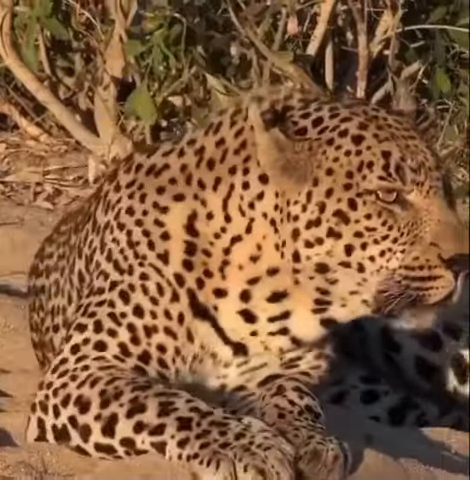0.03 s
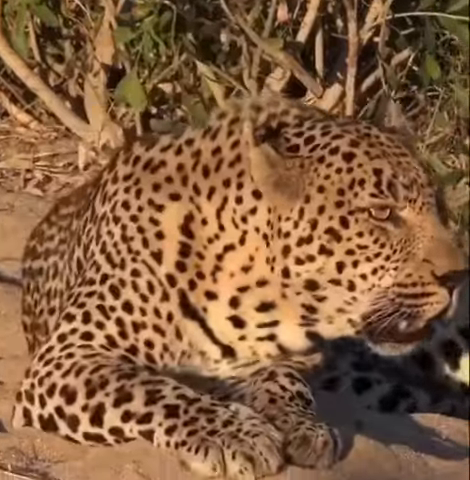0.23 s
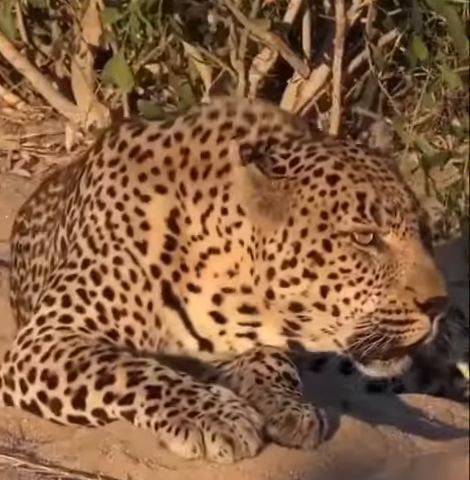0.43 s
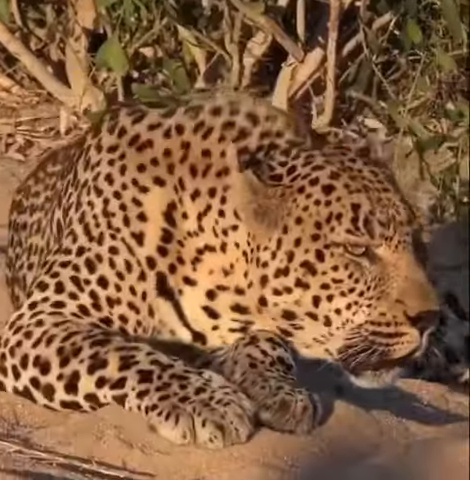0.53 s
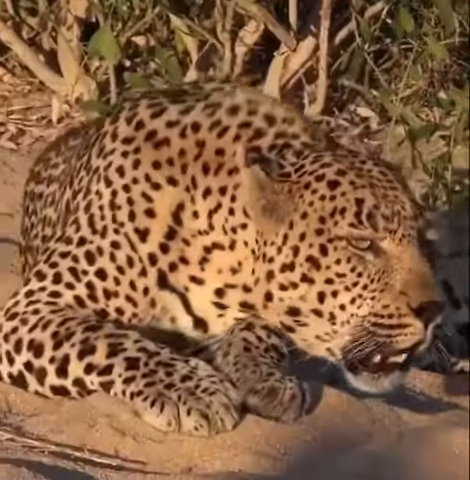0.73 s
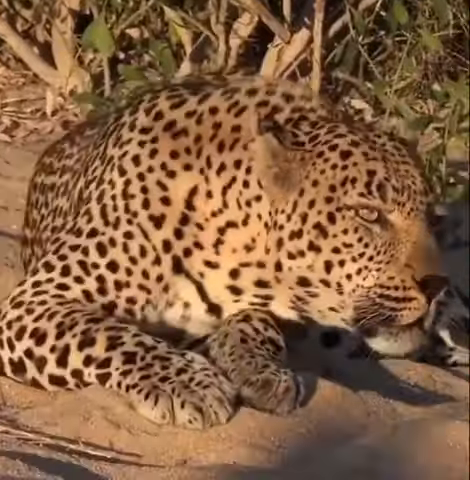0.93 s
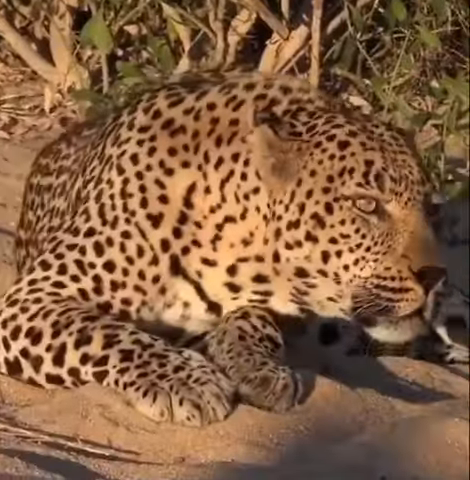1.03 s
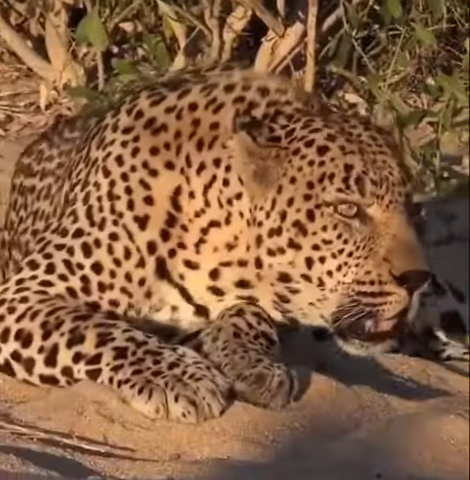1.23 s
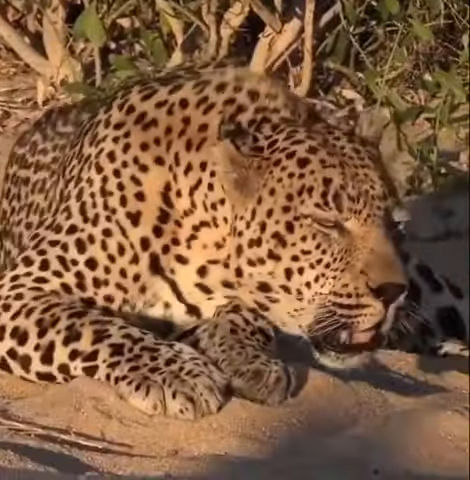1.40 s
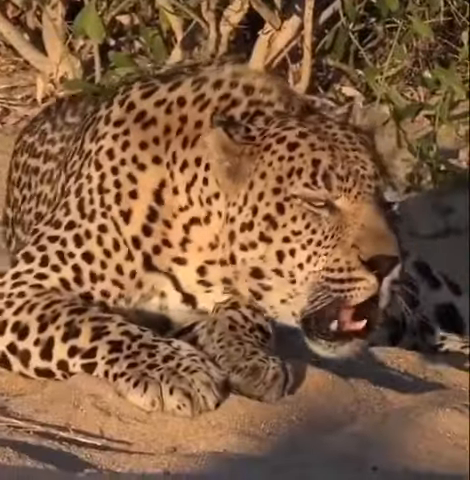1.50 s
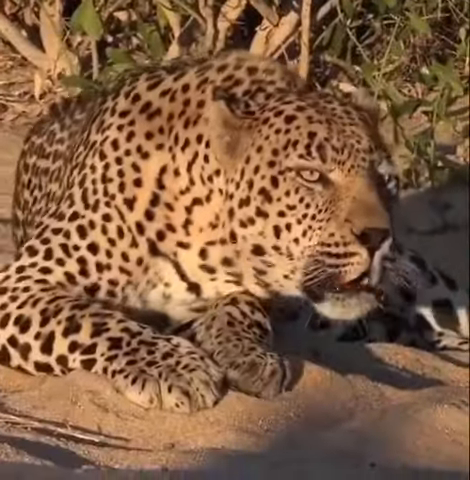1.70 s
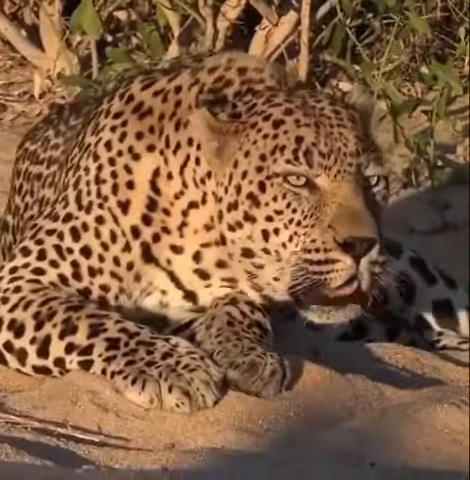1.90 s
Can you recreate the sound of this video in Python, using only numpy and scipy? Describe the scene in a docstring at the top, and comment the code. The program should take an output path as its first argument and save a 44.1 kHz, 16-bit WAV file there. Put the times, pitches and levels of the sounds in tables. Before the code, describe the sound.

A leopard growls twice, low and rasping, with quieter inward rasps around the growls.

```python
"""Leopard growling close by

Two loud outward growls, with quieter, slacker inward rasps around them. The throat hums near 200 Hz
while loose folds flap 15-65 times a second; each flap renews the hum, rings the mouth and spits air.
Tongue and palate click wetly. Behind lie two distant bird notes and a faint outdoor wash."""
import sys
import numpy as np
from scipy import signal
from scipy.fft import rfft, irfft
from scipy.io import wavfile
from scipy.ndimage import uniform_filter1d

SR = 44100
rng = np.random.default_rng(int(sys.argv[2]) if len(sys.argv) > 2 else 0)


def transcribe(signal):
    """Save signal, clipped to [-1, 1], as a 16-bit WAV file at the path in sys.argv[1]."""
    frames = np.atleast_2d(signal).T
    limited = np.clip(frames, -1, 1)
    pcm = np.round(limited * 32767).astype(np.int16)
    wavfile.write(sys.argv[1], SR, pcm)


N = 85995
T = np.arange(N) / SR

# Folds and tract, per growl: t/s, flap rate/Hz, throat f/Hz, mouth f/Hz, mouth decay/s
OUT_GESTURES = [
    [(.561, 47.4, 182.2, 630, 0.0053), (.59, 48, 194.7, 543, 0.002), (.66, 48.6, 212.1, 670, 0.0038),
     (.745, 51, 207.2, 700, 0.015), (.82, 38.7, 164, 632, 0.017), (.95, 19.9, 137.6, 627, 0.023)],
    [(1.381, 51.8, 184, 694, 0.0014), (1.41, 51, 192.6, 691, 0.0086), (1.46, 65.2, 220.1, 636, 0.01),
     (1.52, 61.7, 215.2, 624, 0.03), (1.57, 53.7, 206.4, 709, 0.0041), (1.62, 39, 169.8, 620, 0.017),
     (1.715, 24.7, 150.3, 637, 0.0046)],
]
# Drive, per growl: t/s, throat level/dB, mouth level/dB, rasp level/dB, hiss level/dB
OUT_DRIVE = [
    [(0.56, -14, -30.5, -35.5, -45), (0.59, -7.5, -14.5, -47, -40.5), (0.628, -4.5, -9, -29, -36.5),
     (0.634, -8.5, -14.5, -49, -40), (0.684, -5.5, -14, -26.5, -39), (0.714, -7, -32, -57, -47),
     (0.726, -6.5, -22.5, -35, -39.5), (0.774, -8.5, -16.5, -31, -42.5), (0.82, -10, -18, -32, -43),
     (0.89, -18, -40, -48, -50), (0.926, -19, -44, -38, -48.5), (0.946, -27.5, -48, -44.5, -56),
     (0.96, -33, -45, -53, -57)],
    [(1.38, -18.5, -31, -42.5, -45), (1.424, -8.5, -14.5, -22.5, -34.5), (1.436, -7, -17, -31, -38),
     (1.516, -9, -13.5, -27.5, -34.5), (1.546, -11.5, -32, -34, -39), (1.568, -4, -17.5, -26, -31.5),
     (1.588, -11.5, -17, -27, -38.5), (1.642, -10.5, -22.5, -32.5, -47.5), (1.652, -18, -20, -48, -31),
     (1.662, -14.5, -37, -50, -44.5), (1.694, -20, -41, -52, -53), (1.706, -27, -51, -43, -54.5),
     (1.73, -20, -54, -64, -63)],
]
# Muzzle response: f/Hz, level/dB
OUT_MUZZLE = [(440, -34.5), (750, 1), (786, -4), (918, -14), (985, -3), (1060, -19), (1160, -18.5),
              (1260, -12.5), (1390, -17), (1640, -8.5), (1780, -20), (2010, -9), (2290, -16), (2610, -27),
              (2830, -27.5), (3270, -27), (3680, -22), (4140, -25.5), (5190, -27), (5990, -32),
              (8150, -33.5), (9510, -43.5), (12800, -46.5), (16600, -92), (22000, -120)]
# Narrow muzzle resonances: f/Hz, width/Hz, gain
OUT_RESONANCES = [(990, 12, .4), (1677, 63, .8), (2010, 34, .7), (2780, 160, .8), (3600, 100, 1.3),
                  (3830, 53, 0.29), (4420, 23, 2.6), (5080, 110, .7), (5760, 52, 1.2), (8190, 300, 0.68)]


def outward_growls():
    """Breath driven out through a tight, steadily humming throat."""
    return sum(growl(gesture, drive, OUT_MUZZLE, OUT_RESONANCES, jitter_s=0.00019, damp_s=0.0044,
                     hum_db=9, hum_rise_s=0.0046, hum_decay_s=0.018, wobble=0.0397,
                     puff_db=-16.5, puff_hz=71.7, side_db=-5, side_ratio=1.148, mouth_db=9.5,
                     rasp_db=9.5, rasp_decay_s=0.0047, hiss_db=2, hiss_decay_s=0.013,
                     leak_gain=0.2, grit_db=2.5, hoarse_db=-0.5, snap_gain=10.8)
               for gesture, drive in zip(OUT_GESTURES, OUT_DRIVE))


# Folds and tract, per rasp: t/s, flap rate/Hz, throat f/Hz, mouth f/Hz, mouth decay/s
IN_GESTURES = [
    [(.188, 60.6, 168.8, 630, 0.0047), (.23, 28.9, 161.1, 633, 0.014), (.335, 15, 162, 605, 0.014)],
    [(.372, 32.2, 163, 665, 0.0037), (.48, 40.3, 157, 615, 0.0086)],
    [(1.151, 55.4, 158.6, 647, 0.015), (1.23, 39, 161.6, 587, 0.0069), (1.32, 51.7, 167.7, 610, 0.014)],
    [(1.886, 36.5, 170, 607, 0.042), (1.95, 54.6, 177, 615, 0.02)],
]
# Drive, per rasp: t/s, throat level/dB, mouth level/dB, rasp level/dB, hiss level/dB
IN_DRIVE = [
    [(0.19, -24, -37, -32.5, -41.5), (0.218, -10.5, -42, -51, -57), (0.246, -31, -35.5, -29.5, -39.5),
     (0.278, -21.5, -44.5, -44, -51), (0.298, -44, -47, -39, -57), (0.34, -47, -55, -42, -51)],
    [(0.37, -32.5, -43, -37.5, -49), (0.434, -16, -36, -34, -53), (0.442, -20.5, -33, -40, -44),
     (0.462, -25, -33.5, -38, -53), (0.47, -39, -45, -22, -57), (0.49, -50, -44, -49, -57)],
    [(1.15, -17.5, -40, -26.5, -54), (1.168, -19.5, -37.5, -43.5, -41.5), (1.268, -18, -33.5, -32, -42),
     (1.282, -8.5, -68, -40, -47), (1.312, -20.5, -23.5, -33.5, -42), (1.34, -37, -47, -58, -64)],
    [(1.885, -8.5, -31.5, -33, -37.5), (1.905, -35, -38, -42, -57), (1.923, -16.5, -54, -71, -49),
     (1.939, -23, -39, -76, -59), (1.945, -27, -43, -55, -56)],
]
# Muzzle response: f/Hz, level/dB
IN_MUZZLE = [(440, -1.5), (750, 16.5), (896, 7), (1060, -25.5), (1390, -0.5), (1940, 0), (2110, -2.5),
             (2430, -5), (2640, -27), (3040, -18), (3310, -28.5), (3810, -22), (4450, -24.5), (5010, -30),
             (6280, -34.5), (8060, -32), (12800, -44.5), (16600, -67), (22000, -120)]
# Narrow muzzle resonances: f/Hz, width/Hz, gain
IN_RESONANCES = [(910, 96, 2.4), (1440, 74, 1.4), (1885, 54, 0.33), (2070, 71, 0.35), (3007, 41, 0.45),
                 (3410, 120, 2.2), (3774, 95, 1), (5000, 460, 3), (5630, 150, 2.7)]


def inward_rasps():
    """Air drawn back in over slack, unsteadily flapping folds."""
    return sum(growl(gesture, drive, IN_MUZZLE, IN_RESONANCES, jitter_s=0.00249, damp_s=0.012,
                     hum_db=6, hum_rise_s=0.0043, hum_decay_s=0.057, wobble=0.1064,
                     puff_db=-2.5, puff_hz=79.8, side_db=-7, side_ratio=1.83, mouth_db=11,
                     rasp_db=-3, rasp_decay_s=0.0057, hiss_db=-4, hiss_decay_s=0.0031,
                     leak_gain=0.75, grit_db=3.5, hoarse_db=-14, snap_gain=2.6)
               for gesture, drive in zip(IN_GESTURES, IN_DRIVE))


# Hoarse noise round the mouth resonance: f/Hz, level/dB
HOARSE_SPECTRUM = [(30, -40.5), (200, -4.5), (420, -16), (560, 2.5), (830, -2.5), (1100, -12.5),
                   (2500, -57)]
# Soft air noise under the hum: f/Hz, level/dB
BREATH_SPECTRUM = [(30, -8), (90, -2.5), (350, -6.5), (520, -18.5), (700, -18), (1500, -45), (4000, -80)]


def growl(gesture, drive, muzzle, resonances, jitter_s, damp_s, hum_db, hum_rise_s, hum_decay_s, wobble,
          puff_db, puff_hz, side_db, side_ratio, mouth_db, rasp_db, rasp_decay_s, hiss_db, hiss_decay_s,
          leak_gain, grit_db, hoarse_db, snap_gain):
    """Each flap pushes a puff, renews the hum, rings the mouth until the next flap and spits air."""
    lookahead_s, last_gap_s, onrush_s, split_hz = 0.0068, 0.034, 0.021, 2870
    t = np.arange(0, 0.12, 1 / SR)
    times = flap_times(gesture, jitter_s)
    voice, snaps, hum_env, rasp_env, hiss_env, hoarse_env, breath_env = np.zeros((7, N))
    for at_s, gap_s in zip(times, np.r_[np.diff(times), last_gap_s]):
        _, throat_hz, mouth_hz, mouth_decay_s = curve(gesture, at_s + lookahead_s)
        throat, mouth, rasp, hiss = curve(drive, at_s + lookahead_s)  # dB
        gate = 1 / (1 + np.exp(np.minimum(2 * (t - gap_s) / damp_s, 50)))  # closes at the next flap
        puff = amp(puff_db + 0.29 * throat) * ring(t, puff_hz, 0.0017, 0.004)
        side_ring = amp(throat + side_db) * ring(t, side_ratio * throat_hz, 0.006, 0.042)
        mouth_ring = amp(mouth + mouth_db) * ring(t, mouth_hz, 0.0005, mouth_decay_s)
        leak = leak_gain * burst(t, 0.0044, 0.063) * gate
        hoarse_gain = amp(mouth + hoarse_db) * np.sqrt(0.005 / mouth_decay_s)
        add(voice, at_s, puff - (side_ring + mouth_ring) * gate)
        add(snaps, at_s, np.array([snap_gain * amp(rasp)]))
        add(hum_env, at_s, amp(throat + hum_db) * burst(t, hum_rise_s, hum_decay_s) * gate)
        add(rasp_env, at_s, amp(rasp + rasp_db) * (burst(t, 0.0016, rasp_decay_s) + leak))
        add(hiss_env, at_s, amp(hiss + hiss_db) * (burst(t, 0.0011, hiss_decay_s) + 2.98 * leak))
        add(hoarse_env, at_s, hoarse_gain * burst(t, 0.0032, 0.013) * gate)
        add(breath_env, at_s, amp(-27 + 0.4 * throat) * burst(t, 0.0023, 0.027))
    onrush = 0.5 * np.exp(-abs(T - times[0]) / onrush_s)  # air leaks just before the first flap
    for env in rasp_env, hiss_env:
        env += env[round((times[0] + lookahead_s) * SR)] * onrush
    hum_hz = curve(gesture, T)[1] * (1 + wobble * waver(samples=200))
    voice += hum_env * tone(hum_hz)
    hz = np.fft.rfftfreq(2048, 1 / SR)
    tract = muzzle_gain(muzzle, resonances, hz)
    low_share = 1 / (1 + (hz / split_hz) ** 10)
    return (voice
            + colour(rasp_env * grit(grit_db) + snaps, tract * np.sqrt(low_share))
            + colour(hiss_env * grit(grit_db), tract * np.sqrt(1 - low_share))
            + colour(hoarse_env * grit(grit_db), amp(spectrum(HOARSE_SPECTRUM, hz)))
            + colour(breath_env * rng.standard_normal(N), amp(spectrum(BREATH_SPECTRUM, hz))))


def flap_times(gesture, jitter_s):
    """The folds flap once per cycle of the flap rate, slightly off time."""
    t = np.arange(gesture[0][0], gesture[-1][0], 1 / SR)
    cycles = np.cumsum(curve(gesture, t)[0]) / SR
    times = np.interp(np.arange(int(cycles[-1]) + 1), cycles, t)
    return times + jitter_s * rng.standard_normal(len(times))


def muzzle_gain(muzzle, resonances, hz, low_edge_hz=672):
    """Broad muzzle response with narrow resonances on top and the bass cut."""
    peaks = sum(gain / (1 + (2 * (hz - peak_hz) / width_hz) ** 2)
                for peak_hz, width_hz, gain in resonances)
    return amp(spectrum(muzzle, hz)) * (1 + peaks) / np.sqrt(1 + (low_edge_hz / (hz + 1)) ** 10)


# Lone flaps: t/s, level/dB, throat f/Hz
LONE_FLAPS = [(0.346, -29.5, 182.5), (0.532, -20.5, 183.6), (1.066, -24.5, 163.3), (1.331, -21, 205),
              (1.811, -20.5, 158)]


def gulps():
    """Single soft flaps ring the throat as the airflow turns round."""
    out, t = np.zeros(N), np.arange(0, 0.15, 1 / SR)
    for at_s, db, throat_hz in LONE_FLAPS:
        puff = amp(-9) * ring(t, hz=61, rise_s=0.0048, decay_s=0.029)
        throat = ring(t, throat_hz, rise_s=0.0019, decay_s=0.026)
        add(out, at_s, amp(db) * (puff - throat))
    return out


# Wet clicks: t/s, level/dB, f/Hz, decay/s
TONGUE_CLICKS = [(0.19, -30.5, 1570, 0.0083), (0.193, -39, 4400, 0.01), (.24, -42, 3240, 0.012),
                 (.469, -29.5, 2370, 0.0049), (0.624, -17, 1090, 0.0073), (.624, -23, 2050, .005),
                 (.666, -30, 3540, 0.0085), (1.242, -21.5, 2080, 0.002), (1.253, -32.5, 1830, 0.0055),
                 (1.266, -40, 5100, 0.007), (1.4, -22.5, 3630, 0.0052), (1.422, -24, 4570, 0.0073),
                 (1.571, -23.5, 1640, 0.0097), (1.613, -19.5, 1610, 0.0074), (1.701, -32, 2130, 0.0091),
                 (1.919, -35, 2200, 0.011)]


def smacks():
    """Tongue and palate click in short bursts of resonant noise."""
    out, t = np.zeros(N), np.arange(0, 0.15, 1 / SR)
    for at_s, db, hz, decay_s in TONGUE_CLICKS:
        resonance = ring(t, hz, rise_s=0.0001, decay_s=0.0021)
        fizz = signal.fftconvolve(rng.standard_normal(len(t)), resonance)[:len(t)]
        add(out, at_s, amp(db) * unit(fizz) * burst(t, 0.0004, decay_s))
    return out


def bush_scatter(x, mid_db=-19, side_db=-31):
    """Brief, weak stereo reflections from sand and bushes."""
    t = np.arange(0, 0.2, 1 / SR)
    tails = rng.standard_normal((2, len(t))) * burst(t, rise_s=0.0023, decay_s=0.025)
    mid, side = (signal.fftconvolve(x, tail / np.linalg.norm(tail))[:N] for tail in tails)
    return x + amp(mid_db) * mid + amp(side_db) * np.array([side, -side])


# Bird notes: t/s, length/s, start f/Hz, end f/Hz, level/dB
BIRD_NOTES = [(.285, .09, 4550, 3200, -54), (.97, .07, 2430, 2400, -58)]


def birds(wobble=0.022):
    """Thin, wavering whistles far away, one falling, one nearly level."""
    out = np.zeros(N)
    for at_s, length_s, start_hz, end_hz, db in BIRD_NOTES:
        progress = np.linspace(0, 1, int(length_s * SR))
        glide_hz = start_hz * (end_hz / start_hz) ** progress
        hz = glide_hz * (1 + wobble * waver(samples=30)[:len(progress)])
        swell = np.sqrt(abs(np.sin(np.pi * progress)))
        add(out, at_s, amp(db) * swell * tone(hz))
    return out


# Background colour: f/Hz, level/dB
WASH_SPECTRUM = [(25, 7), (70, 8), (177, 9.5), (300, -3), (600, 1), (1000, -0.5), (1550, 0), (2100, -8.5),
                 (3700, -9.5), (4800, -15.5), (7800, -9.5), (13000, -18)]
# Background loudness: t/s, level/dB
WASH_ENVELOPE = [(0, -46.5), (.5, -44), (.7, -52), (1.1, -51), (1.8, -49.5), (1.95, -48)]
# Background width: f/Hz, left-right correlation
WASH_CORRELATION = [(30, 0.63), (1000, 0.89), (3500, 1), (5500, 0.5), (12000, 0.59)]


def outdoor_wash():
    """Faint background noise, a little wider in the treble."""
    hz = np.fft.rfftfreq(N, 1 / SR)
    left, independent = rfft(rng.standard_normal((2, N)))
    correlation = spectrum(WASH_CORRELATION, hz)
    right = correlation * left + np.sqrt(1 - correlation ** 2) * independent
    noise = irfft(np.array([left, right]) * amp(spectrum(WASH_SPECTRUM, hz)), N)
    return unit(noise) * amp(curve(WASH_ENVELOPE, T)[0])


def amp(db):
    """Decibels to gain."""
    return 10 ** (np.asarray(db) / 20)


def unit(x):
    """Scales to rms 1."""
    return x / np.sqrt(np.mean(x ** 2) + 1e-20)


def curve(rows, at_s):
    """A table's value columns, interpolated in time."""
    times, *columns = np.transpose(rows)
    return [np.interp(at_s, times, column) for column in columns]


def spectrum(rows, hz):
    """A table's values, interpolated in log frequency."""
    row_hz, values = np.transpose(rows)
    return np.interp(np.log(hz + 1), np.log(row_hz), values)


def add(mix, at_s, sound):
    """Mixes a sound in place."""
    part = mix[max(round(at_s * SR), 0):][:len(sound)]
    part += sound[:len(part)]


def colour(x, gain):
    """Minimum-phase filter of unit energy, shaped by gains from 0 Hz to SR / 2."""
    log_gain = np.log(np.maximum(gain / gain.max(), 1e-4))
    mirrored = np.r_[log_gain, log_gain[-2:0:-1]]
    response = np.exp(np.conj(signal.hilbert(mirrored)))
    taps = irfft(response[:len(gain)])
    return signal.fftconvolve(x, taps / np.linalg.norm(taps))[:N]


def burst(t, rise_s, decay_s):
    """Quick swell, exponential fall."""
    return (1 - np.exp(-(t / rise_s) ** 2)) * np.exp(-t / decay_s)


def ring(t, hz, rise_s, decay_s):
    """A struck resonance."""
    return burst(t, rise_s, decay_s) * np.sin(2 * np.pi * hz * t)


def tone(hz):
    """Sine following a frequency track."""
    return np.sin(2 * np.pi * np.cumsum(hz) / SR)


def waver(samples):
    """Smoothed noise of rms 1."""
    return unit(uniform_filter1d(uniform_filter1d(rng.standard_normal(N), samples), samples))


def grit(flicker_db):
    """Noise of rms 1 whose level flickers rapidly."""
    return unit(rng.standard_normal(N) * amp(flicker_db * waver(samples=24)))


def scene():
    """The cat in the centre, the bush around it."""
    leopard = outward_growls() + inward_rasps() + gulps() + smacks()
    return bush_scatter(leopard) + birds() + outdoor_wash()


def record(dry, low_cut_hz=63, high_cut_hz=13100):
    """The microphone sheds the deepest bass and rounds the loudest peaks; then the band limit."""
    thin = signal.sosfilt(signal.butter(2, low_cut_hz, "highpass", fs=SR, output="sos"), dry)
    rounded = thin / (1 + thin ** 10) ** (1 / 10)
    lowpass = signal.firwin(511, high_cut_hz, window=("kaiser", 9), fs=SR)
    return signal.oaconvolve(rounded, lowpass[None], "same")


dry = scene()
out = record(dry)
transcribe(out)
```